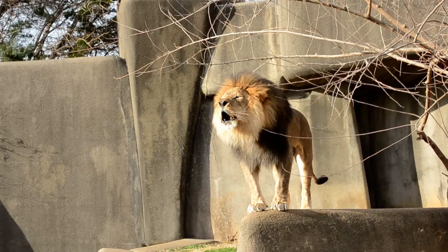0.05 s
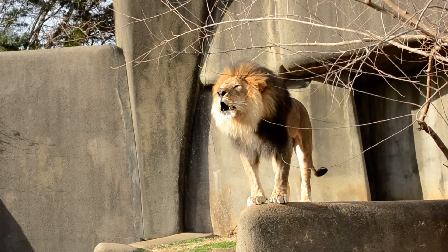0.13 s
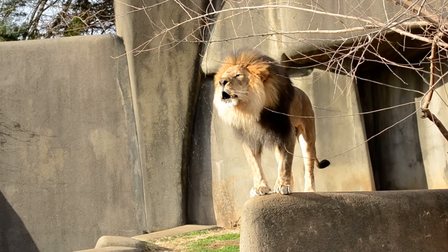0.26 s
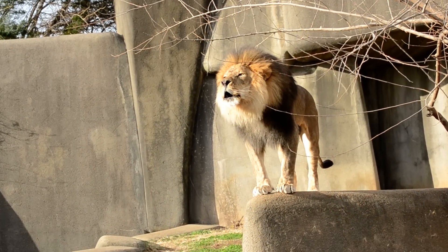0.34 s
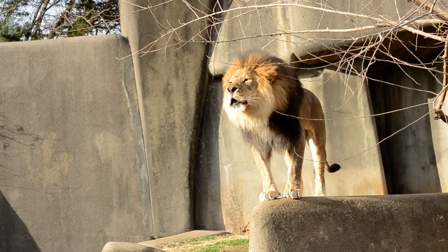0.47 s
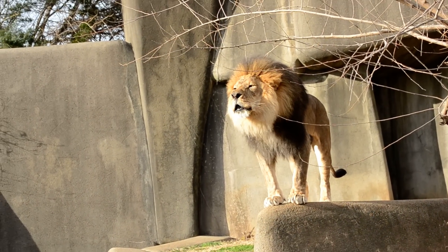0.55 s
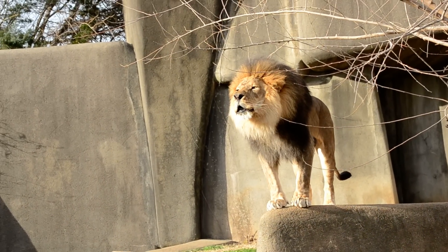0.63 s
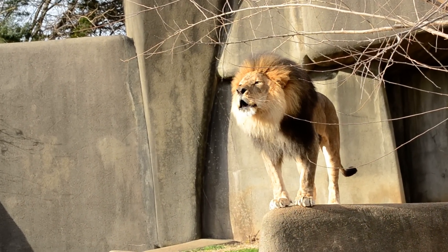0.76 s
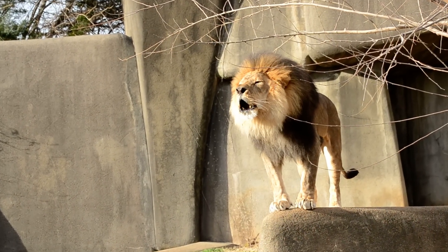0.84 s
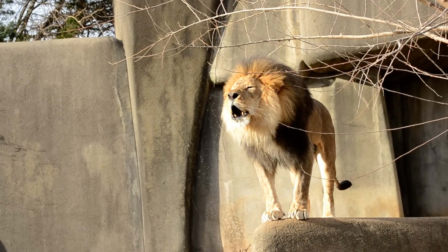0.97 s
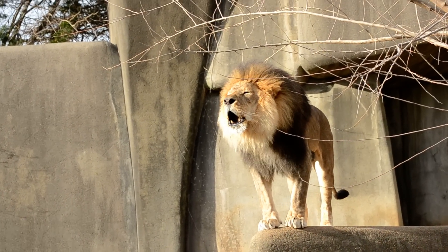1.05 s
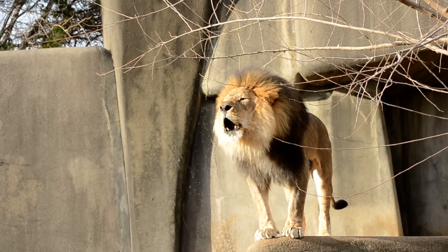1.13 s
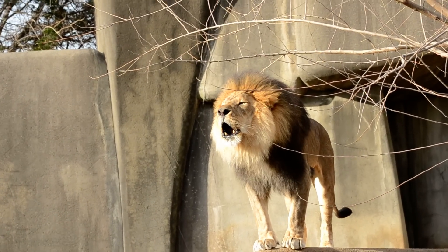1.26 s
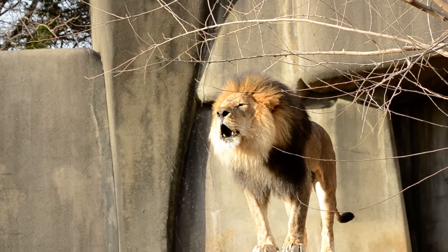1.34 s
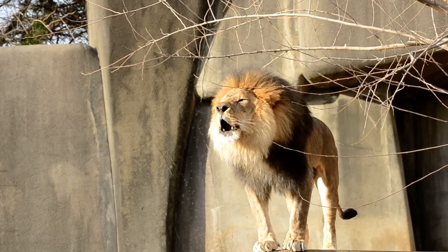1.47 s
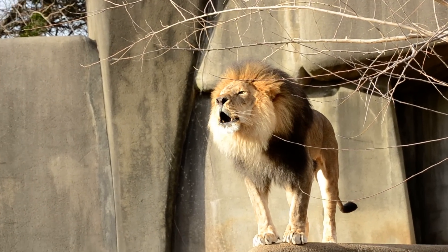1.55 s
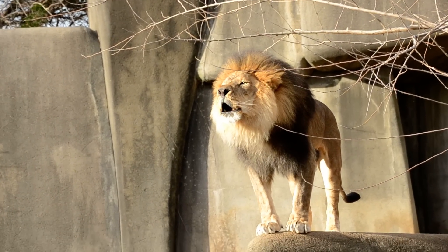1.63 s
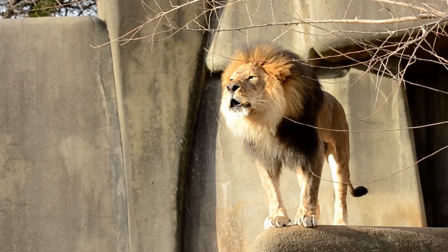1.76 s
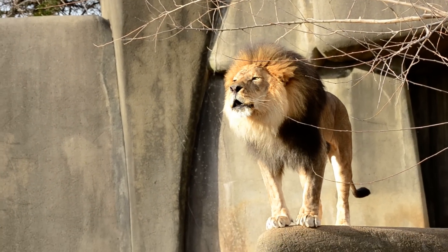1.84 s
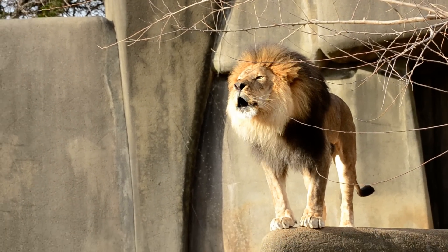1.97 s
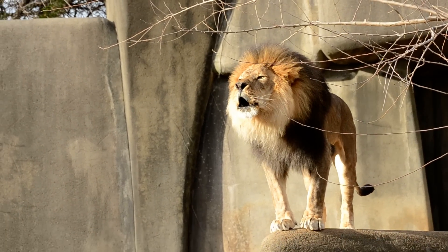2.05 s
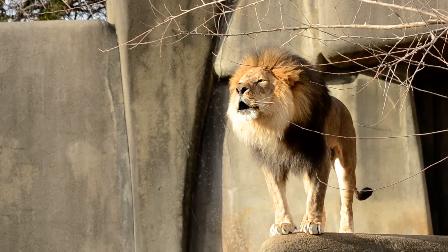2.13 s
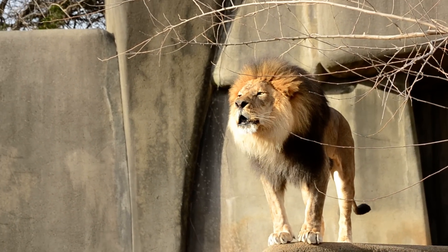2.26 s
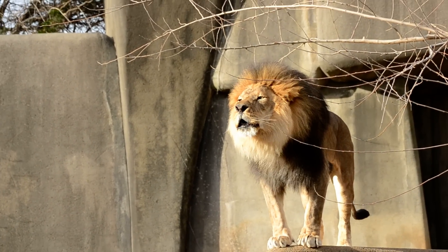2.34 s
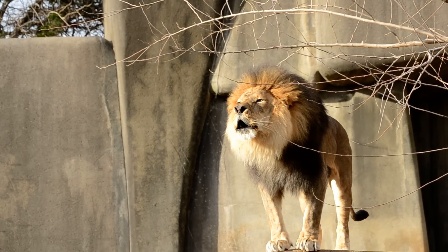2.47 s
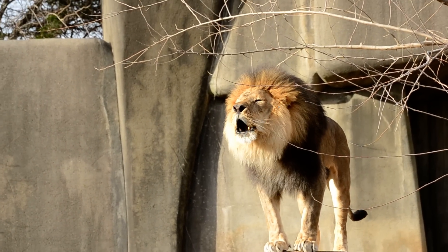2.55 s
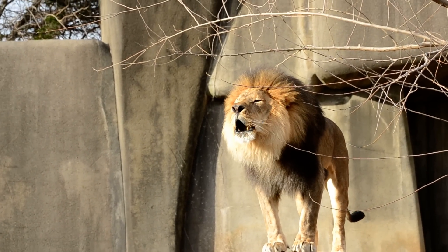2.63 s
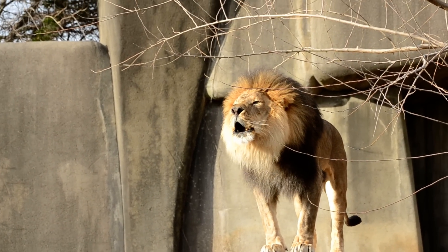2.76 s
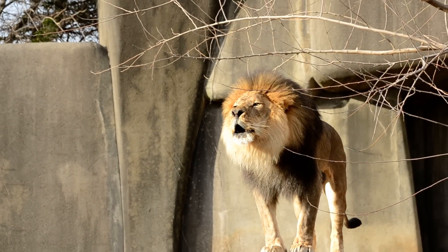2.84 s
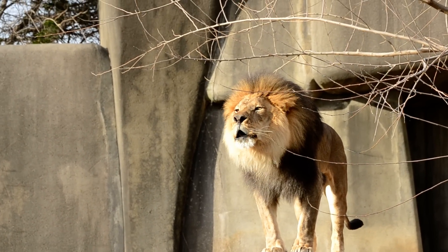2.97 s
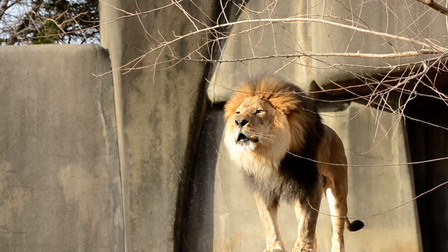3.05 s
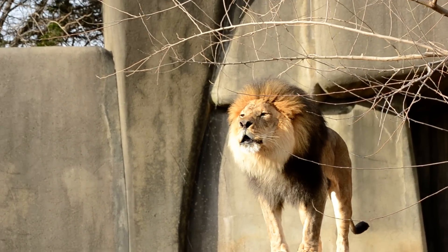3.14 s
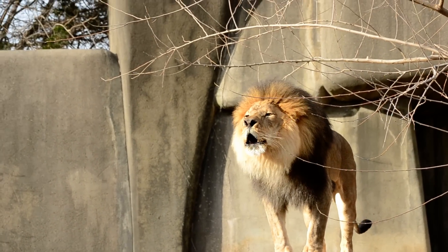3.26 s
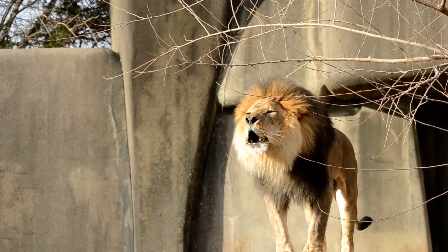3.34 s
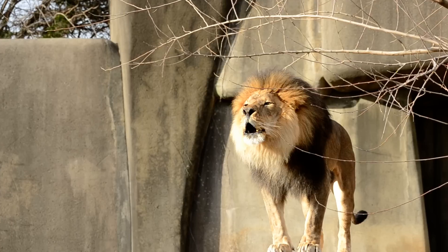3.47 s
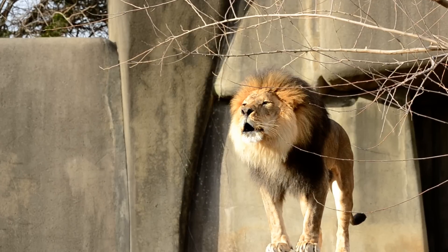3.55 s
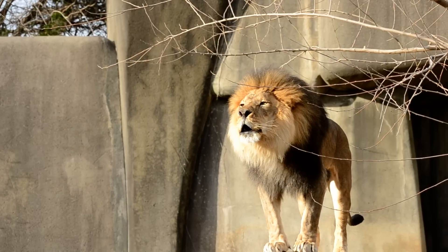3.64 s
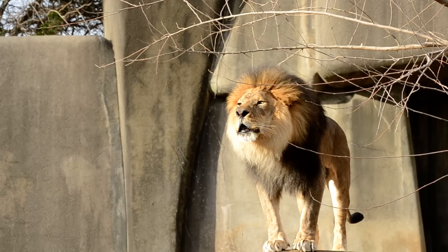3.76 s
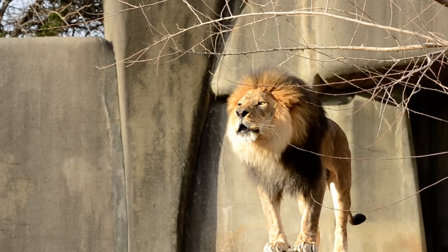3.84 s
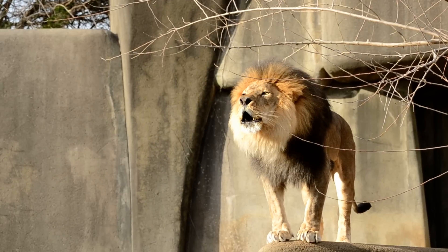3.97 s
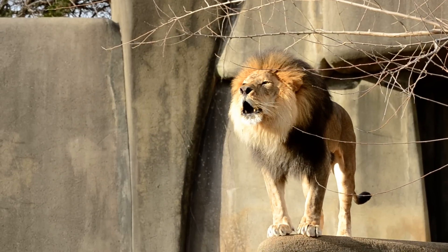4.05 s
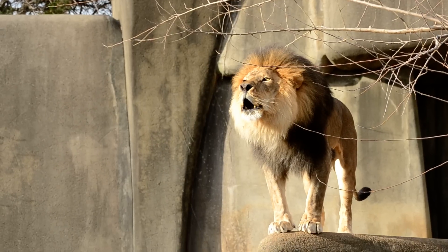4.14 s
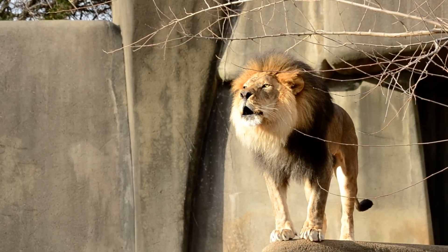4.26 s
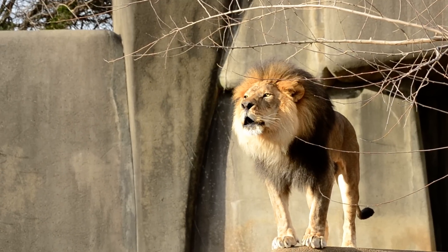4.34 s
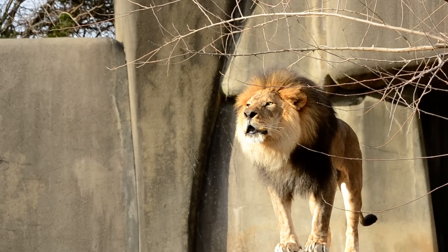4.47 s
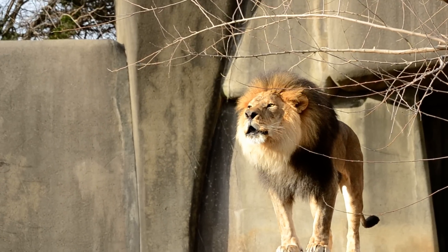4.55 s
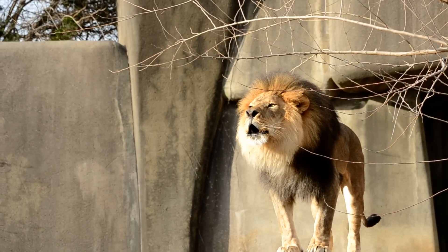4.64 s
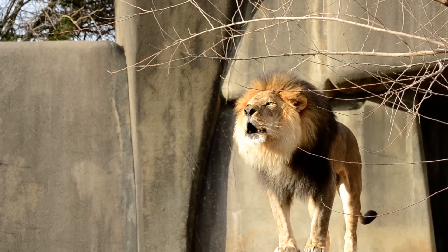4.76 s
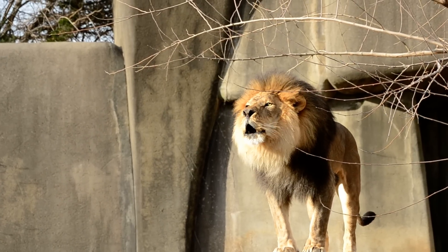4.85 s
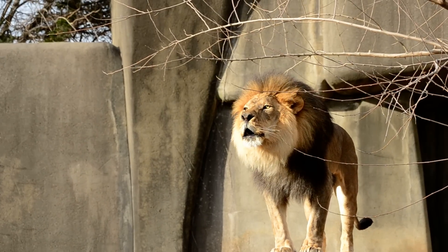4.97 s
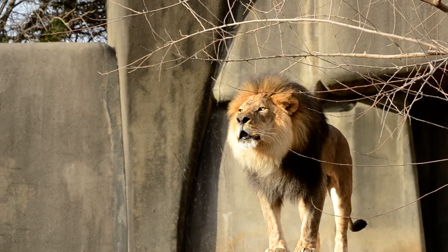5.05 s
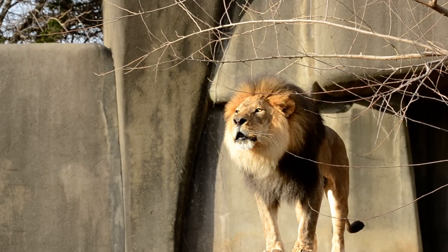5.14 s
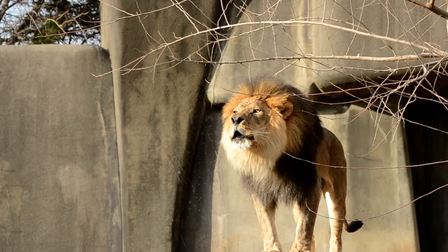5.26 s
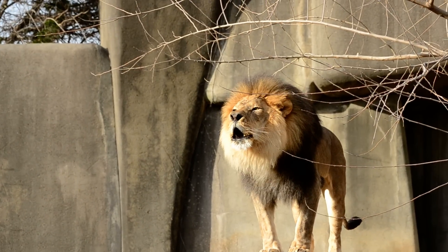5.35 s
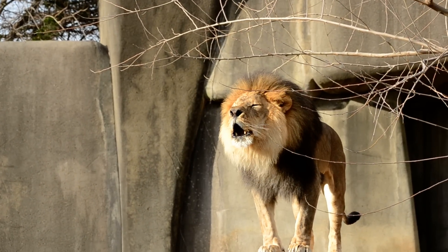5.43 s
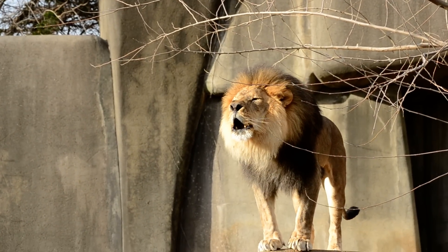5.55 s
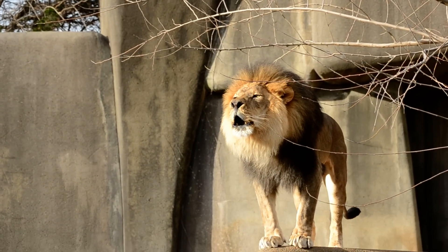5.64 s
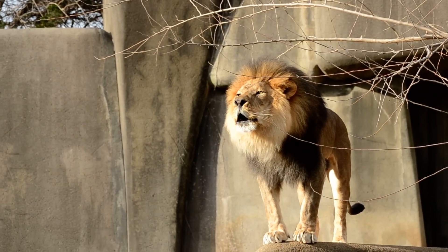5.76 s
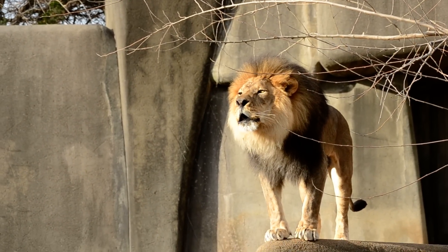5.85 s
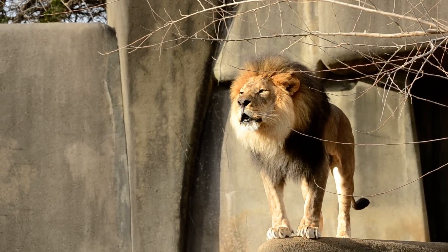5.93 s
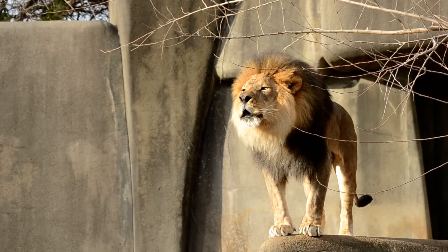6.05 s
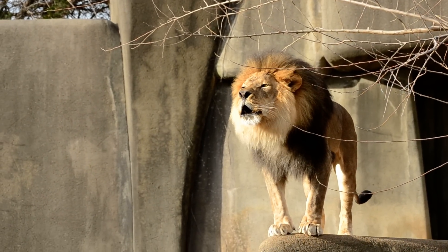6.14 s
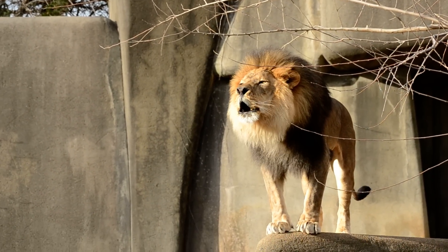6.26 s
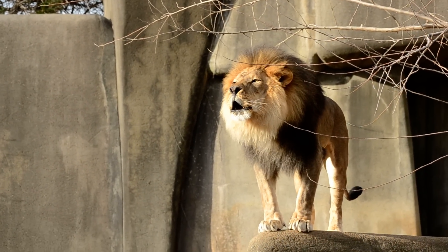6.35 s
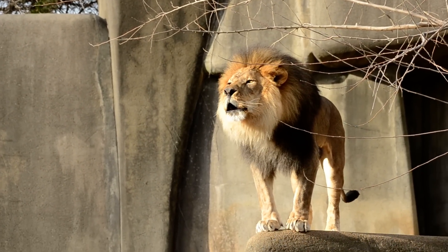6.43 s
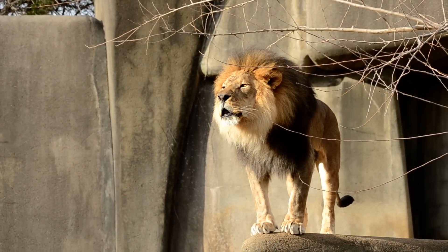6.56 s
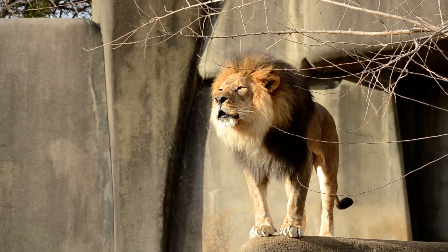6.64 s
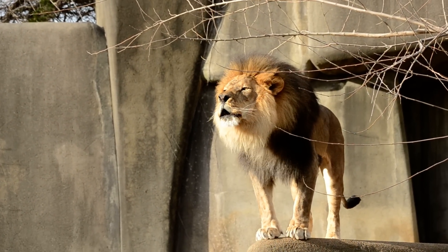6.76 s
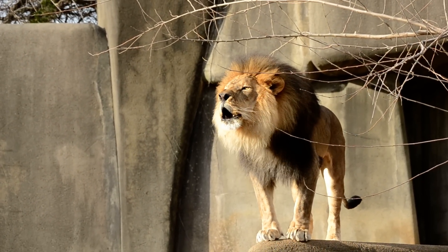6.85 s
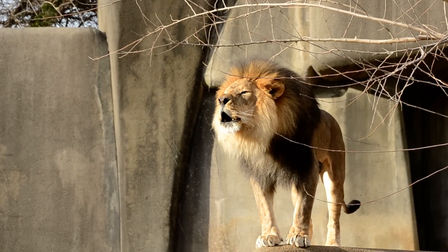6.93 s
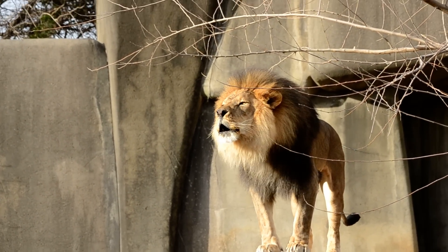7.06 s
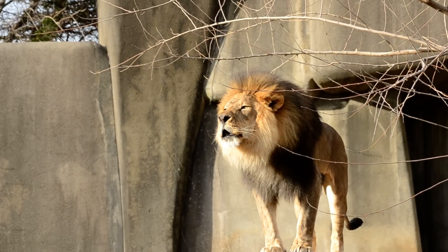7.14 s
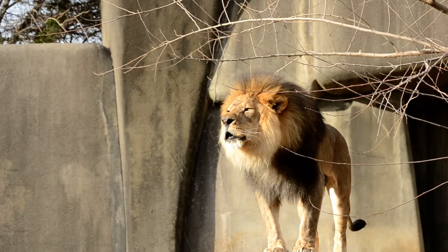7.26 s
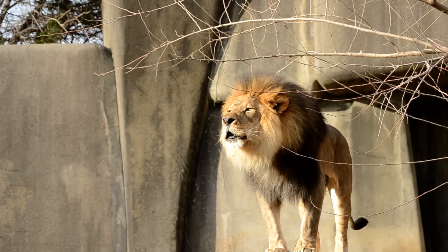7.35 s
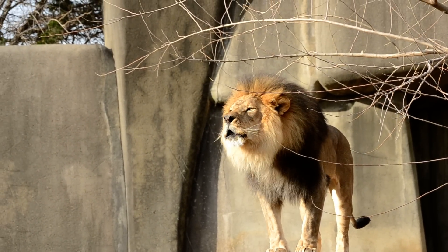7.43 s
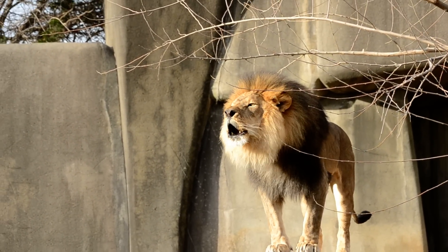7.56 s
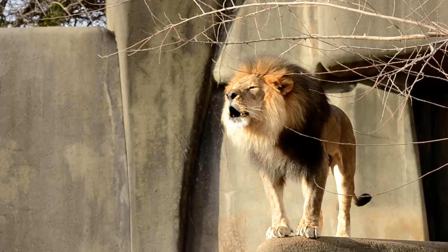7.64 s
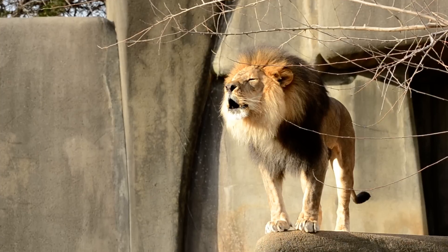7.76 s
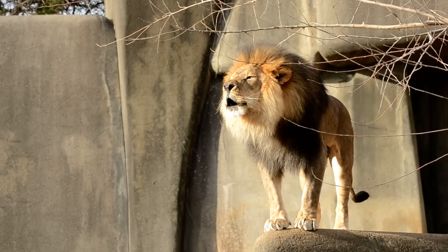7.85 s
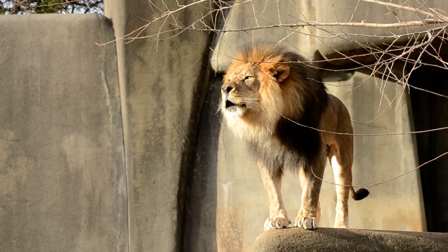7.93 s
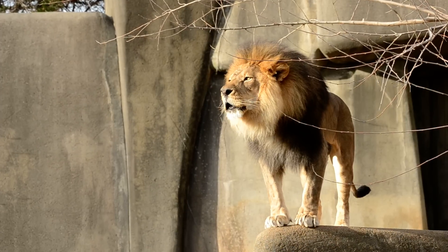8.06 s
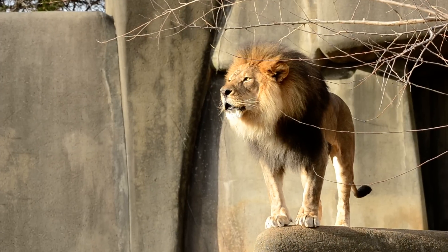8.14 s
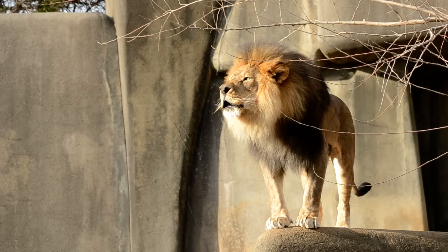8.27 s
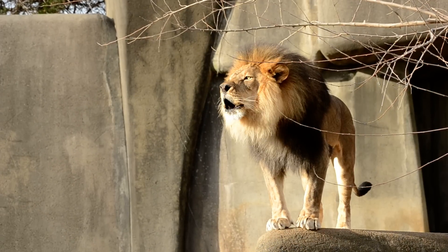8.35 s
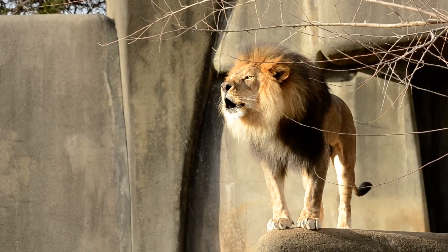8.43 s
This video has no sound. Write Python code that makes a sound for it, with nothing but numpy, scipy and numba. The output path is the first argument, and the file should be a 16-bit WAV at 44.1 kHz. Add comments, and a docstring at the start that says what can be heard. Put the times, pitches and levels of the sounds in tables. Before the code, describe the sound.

In an outdoor concrete enclosure, a male lion roars twelve times. The second call is a long, fuller moan; the rest are short, deep, rasping grunts that weaken slightly toward the end. His throat catches with rough slaps, his mouth clicks, and he breathes in softly once. Each call rings briefly off the walls, while a low hum, steady outdoor air and very faint birds sit behind.

```python
"""A male lion roars twelve times in a concrete zoo enclosure: hoarse grunts and one long moan.
His loose vocal folds flap unevenly into a long throat whose resonances rise and sink with each call;
single flaps slap hard, the mouth clicks, and he takes one soft in-breath. The walls throw the roars
back over a steady outdoor wash, a faint machine hum and distant birds."""
import sys
import numpy as np
from scipy import signal
from scipy.io import wavfile
from scipy.ndimage import uniform_filter1d
from numba import njit

SR = 44100
rng = np.random.default_rng(int(sys.argv[2]) if len(sys.argv) > 2 else 0)


def to_wav(s):
    """Save 16-bit WAV."""
    ch = np.atleast_2d(s).T  # columns
    pcm = np.round(np.clip(ch, -1, 1) * 32767)  # PCM
    wavfile.write(sys.argv[1], SR, pcm.astype(np.int16))


N = 374850
TIME = np.arange(N) / SR

# nominal resonances: f/Hz, width/Hz, level/dB in a grunt, then the same in a moan
CHEST_MODES = [(136.6, 19.7, -4.5, 166, 12, 6.5), (184.4, 40.3, -2, 190, 113, -15),
               (232.3, 51, -9, 245, 75, -27), (321, 25.2, 2.5, 393, 32, -0.5),
               (408.7, 53, -6, 550, 21, -13.5), (462, 14, -8.5, 536, 35, -17)]
MOUTH_MODES = [(709.4, 39.2, 5.5, 805, 62, -0.5), (829, 52, 2.5, 1017, 123, -1.5),
               (1072, 13.3, 0, 1200, 45, -5), (1192.6, 54, -3.5, 1216, 115, -12),
               (1280, 67, -45, 960, 46, -26)]
# air rushing past the teeth: f/Hz, relative density/dB
TEETH_SPECTRUM = [(1300, -16.5), (2700, 11), (4700, -5.5), (5700, -11), (7200, -10), (7900, -19),
                  (8500, -8.5), (10300, -9), (11500, -47)]


def gain_of(db):
    """Decibels to amplitude."""
    return 10 ** (np.asarray(db) / 20)


def unit_rms(x):
    """Scales to rms 1."""
    return x / np.sqrt(np.mean(x ** 2) + 1e-20)


def steadied(x, size=2000):
    """Holds the short-term rms at 1; single pulses still stand out."""
    power = uniform_filter1d(uniform_filter1d(x ** 2, size), size // 2)
    return x / np.sqrt(abs(power) + 1e-14)


def at_hz(points, hz):
    """Interpolates a table over log frequency."""
    f, value = np.transpose(points)
    return np.interp(np.log(hz + 1), np.log(f + 1), value)


def add(mix, start_s, sound):
    """Mixes a sound in at start_s."""
    part = mix[max(round(start_s * SR), 0):][:len(sound)]
    part += sound[:len(part)]


def band(x, low_hz, high_hz, order=4):
    """Causal band-pass."""
    return signal.sosfilt(signal.butter(order, [low_hz, high_hz], "band", fs=SR, output="sos"), x)


def coloured(x, spectrum, size=4096):
    """Minimum-phase filter with the given spectrum."""
    log_gain = np.log(gain_of(at_hz(spectrum, abs(np.fft.fftfreq(size, 1 / SR)))))
    taps = np.fft.ifft(np.exp(np.conj(signal.hilbert(log_gain)))).real
    return signal.oaconvolve(x, taps[:size // 2])[:len(x)]


def drift(t, top_hz, count=24):
    """Slow random motion of rms about 1."""
    hz = np.geomspace(top_hz / 10, top_hz, count)[:, None]
    return np.sin(2 * np.pi * (hz * t + rng.random((count, 1)))).sum(0) * np.sqrt(2 / count)


def swing(t, hz, waver, harmonics):
    """A slightly wavering vibration with equal harmonics."""
    turns = np.cumsum(hz * (1 + waver * drift(t, 45))) / SR
    return sum(np.cos(2 * np.pi * k * turns) for k in range(1, harmonics + 1))


@njit
def resonate(x, hz, width_hz):
    """A unit-gain resonance with moving centre and width."""
    out, state = np.zeros(len(x)), 0j
    for i in range(len(x)):
        r = np.exp(-np.pi * width_hz[i] / SR)
        state = state * r * np.exp(2j * np.pi * hz[i] / SR) + (1 - r) * x[i]
        out[i] = 2 * state.real
    return out


def background(wash_db=-43, swell_db=.6, waver_turns=0.11):
    """A nearly steady outdoor wash and a wavering machine hum."""
    # outdoor wash: f/Hz, relative density/dB
    wash_spectrum = [(25, -25), (60, -17), (115, 5), (230, -7), (300, -1.5), (600, -4.5), (950, 0.5),
                     (1500, -11), (2800, -15), (4500, -26.5), (6300, -28), (7900, -39.5), (10000, -36.5),
                     (11700, -67)]
    # machine tones: f/Hz, rms level/dB
    hum_tones = [(120, -70), (298, -55), (384, -61.5)]
    slow = TIME[::500]
    out = unit_rms(coloured(rng.standard_normal(N), wash_spectrum))
    out *= gain_of(wash_db + swell_db * np.interp(TIME, slow, drift(slow, 6)))
    for hz, db in hum_tones:
        turns = hz * TIME + waver_turns * np.interp(TIME, slow, drift(slow, 7.4))
        out += gain_of(db) * np.sqrt(2) * np.sin(2 * np.pi * turns)
    return out


def bird(length_s, hz, db, arch=0.078):
    """A thin whistle that rises and falls."""
    t = np.arange(0, length_s, 1 / SR)
    hump = np.sin(np.pi * t / length_s)
    return gain_of(db) * hump * swing(t, hz * (1 + arch * (hump - .5)), waver=0.022, harmonics=1)


def enclosure(x, tail_db=-8.5, walls_db=-10, walls_s=0.032, echoes=10,
              standing_hz=319, standing_width_hz=7, standing_db=-7):
    """Early echoes off the concrete, a diffuse tail and one standing wave between the walls."""
    # reverberation: f/Hz, T60/s
    decay_times = [(120, 0.51), (330, 0.94), (700, 0.54), (1500, 0.7), (4000, 0.5), (10000, 0.44)]
    taps = rng.standard_normal(SR) * (rng.random(SR) < .1) * np.minimum(TIME[:SR] / 0.041, 1)
    hz, t, spectra = signal.stft(taps, SR, nperseg=256)
    decay = gain_of(-60 * t / at_hz(decay_times, hz)[:, None])
    tail = signal.istft(spectra * decay, SR, nperseg=256)[1]
    response = gain_of(tail_db) * tail / np.linalg.norm(tail)
    arrivals = (SR * (.004 + walls_s * rng.random(echoes))).astype(int)
    response[arrivals] += gain_of(walls_db) * rng.choice([-1, 1], echoes) / np.sqrt(echoes)
    standing = resonate(x, standing_hz * np.ones(N), standing_width_hz * np.ones(N))
    return signal.fftconvolve(x, response)[:N] + gain_of(standing_db) * standing


def lion_inhale():
    """One soft in-breath after a roar: a short, high hiss of air."""
    # breath envelope: t/s, rms level/dB
    envelope = [(5.8, -82), (5.86, -55), (6.03, -55.5), (6.08, -90)]
    noise = unit_rms(band(rng.standard_normal(N), 4000, 8500, order=2))
    return gain_of(np.interp(TIME, *np.transpose(envelope))) * noise


def mouth_click(level_db, hz, trim_db=-1, decay_s=0.002, spread=1.265):
    """A tiny snap that rings briefly in the mouth."""
    t = TIME[:1500]
    snap = rng.standard_normal(len(t)) * np.exp(-t / decay_s)
    sound = band(snap, hz / spread, hz * spread, order=2)
    return gain_of(level_db + trim_db) * sound / abs(sound).max()


def glide(mode, moan):
    """Frequency, width and level of a resonance between grunt (0) and moan (1)."""
    return [a + (b - a) * moan for a, b in zip(mode[:3], mode[3:])]


def throat(x, modes, moan, stretch, damping, skirt=1.42):
    """A bank of gliding resonances; a wider second pass deepens the valleys."""
    out = np.zeros(len(x))
    for mode in modes:
        hz, width_hz, db = glide(mode, moan)
        ring = resonate(x, hz * stretch, width_hz * damping)
        out += gain_of(db) * resonate(ring, hz * stretch, width_hz * damping * skirt)
    return out


def fold_slap(level_db, trim_db=-4, puff_s=0.0051, chest_db=-5, hiss_db=-17, damping=2.32):
    """One hard flap: a single puff rings the slack throat and hisses past the teeth."""
    t = TIME[:3500]
    puff = rng.standard_normal(len(t)) * np.exp(-t / puff_s)
    moan, stretch = np.zeros(len(t)), np.ones(len(t))
    mouth = unit_rms(throat(puff, MOUTH_MODES, moan, stretch, damping))
    chest = unit_rms(throat(puff, CHEST_MODES, moan, stretch, damping))
    hiss = unit_rms(band(coloured(puff, TEETH_SPECTRUM), 1250, 12000))
    sound = mouth + gain_of(chest_db) * band(chest, 130, 700, order=6) + gain_of(hiss_db) * hiss
    return gain_of(level_db + trim_db) * sound / abs(sound).max()


def folds(rate_hz, uneven_db, jitter=.3, puff_s=0.0079, leak=0.18):
    """Uneven flaps, and the puff of turbulent air that each lets through."""
    n = len(rate_hz)
    wobble = unit_rms(uniform_filter1d(rng.standard_normal(n), size=250))
    turns = np.cumsum(rate_hz * np.exp(jitter * wobble)) / SR
    flaps = np.diff(np.floor(turns), prepend=0)
    pulses = flaps * gain_of(uneven_db * np.clip(rng.standard_normal(n), -2, 2))
    airflow = leak + signal.lfilter([1], [1, -np.exp(-1 / (puff_s * SR))], pulses)
    return unit_rms(pulses), unit_rms(airflow * rng.standard_normal(n))


def gesture(t, start_s, length_s, push_db, gape_db, gape_at_s, hoarse_db, moan):
    """Effort, mouth and rasp levels in dB: a quick push, one gape of the jaw, then the air runs out."""
    attack_db, attack_s = 25.5, .03
    sag_db, sag_s = 10, 0.079
    jaw_db, jaw_s = 7, 0.072
    drop_db, drop_s = 13, 0.031  # the rasp dies just before the voice
    surge_db, surge_hz = 1.5, 39.78
    age_s, left_s = t - start_s, start_s + length_s - t
    effort_db = push_db - attack_db * np.exp(-age_s / attack_s) - sag_db * np.exp(-left_s / sag_s)
    shut_db = jaw_db * (1 - np.exp(-((age_s - gape_at_s) / jaw_s) ** 2))
    rasp_db = hoarse_db - .25 * shut_db - drop_db * np.exp(-left_s / drop_s)
    rasp_db += surge_db * drift(t, surge_hz)
    # a tight throat sounds fuller and less hoarse
    return effort_db + 3 * moan, gape_db - shut_db - 4 * moan, rasp_db - 7.5 * moan


def roar(start_s, length_s, push_db, gape_db, gape_at_s, hoarse_db, tuning,
         chest_db=-1, rumble_db=-31, rasp_trim_db=-1, hiss_db=-7, moan_hiss_db=-7, build_s=0.041):
    """One call: flaps and puffs ring the chest, mouth and hoarse upper resonances."""
    # throat tightness: t/s, share (0 grunt, 1 moan)
    tightness = [(0.88, 0.34), (0.97, 0.55), (1.08, 0.97), (1.25, 1.0), (1.38, 0.9), (1.46, .7),
                 (1.54, 0.2), (1.64, 0.0052)]
    # course of a grunt: share of length, flap rate/Hz, unevenness/dB, frequency factor, width factor
    flap_course = [(0, 118, 3, .98, 1.09), (.35, 140, 3.5, 1.02, 1.0), (.7, 115, 5, .98, 1.53),
                   (1.001, 65, 10, 0.914, 1.6)]
    # nominal upper resonances: f/Hz, width/Hz, level/dB in a grunt, then the same in a moan
    rasp_modes = [(1805, 138, 13, 1890, 170, 5.5), (1988, 150, 12.5, 2177, 185, 9.5),
                  (2930, 510, 1.5, 2530, 980, 5), (3385, 594, 5, 3760, 1040, -1.5),
                  (4180, 595, 5, 4960, 370, -7.5)]
    t = np.arange(start_s, start_s + length_s, 1 / SR)
    moan = np.interp(t, *np.transpose(tightness), left=0, right=0)
    effort_db, mouth_db, rasp_db = gesture(
        t, start_s, length_s, push_db, gape_db, gape_at_s, hoarse_db, moan)
    stage, *columns = np.transpose(flap_course)
    progress = np.linspace(0, 1, len(t))
    grunt_hz, uneven_db, arch, blur = (np.interp(progress, stage, c) for c in columns)

    # resonances rise with the push, then sag and blur as the throat slackens
    stretch = (np.clip(tuning, .975, 1.025) * arch) ** (1 - moan)
    stretch *= 1 + 0.0086 * drift(t, 14)
    damping = blur ** (1 - moan)
    pulses, puffs = folds(grunt_hz * (1 + .42 * moan), uneven_db)
    # a smooth low swing in every call; the moan adds a brighter pitch locked to the throat
    low = swing(t, glide(CHEST_MODES[0], moan)[0] * stretch, waver=0.018, harmonics=1)
    bright = swing(t, glide(CHEST_MODES[3], moan)[0] * stretch / 2, waver=0.012, harmonics=12)
    tone = (.88 + .12 * moan) * low / damping
    sung = 0.11 * moan ** 2 * bright
    drive = pulses + 0.83 * puffs + sung
    turbulence = puffs + 0.36 * pulses

    body = band(throat(drive, CHEST_MODES, moan, stretch, damping), 112, 1200, order=6)
    rumble = (1 - moan) * gain_of(rumble_db) * unit_rms(band(pulses, 35, 92, order=2))
    chest = steadied(steadied(body) + tone) + rumble
    mouth = steadied(throat(drive, MOUTH_MODES, moan, stretch, damping))
    rasp = steadied(throat(turbulence + sung, rasp_modes, moan, stretch, damping))
    hiss = steadied(band(coloured(turbulence, TEETH_SPECTRUM), 1100, 20000))
    hiss *= gain_of(hiss_db + moan_hiss_db * moan)
    build = np.sqrt(np.minimum((t - start_s) / build_s, 1))  # turbulence lags the folds
    hoarse = gain_of(rasp_db + rasp_trim_db) * build * (rasp + hiss)
    voice = gain_of(chest_db) * chest + gain_of(mouth_db) * mouth + hoarse
    return gain_of(effort_db) * voice * signal.windows.tukey(len(t), 1800 / len(t))


def scene():
    """Lion and birds in the enclosure, over the background."""
    # calls: t/s, length/s, push/dB, mouth at widest/dB, delay to widest/s, rasp/dB, resonance factor
    roars = [ (0.043, 0.34, -21.5, 6.5, 0.13, -9.5, 1.037), (0.887, .82, -21.5, 3.5, 0.657, -6.5, 1.0),
             (2.026, 0.17, -21, 4, 0.068, -7.5, .99), (2.580, 0.34, -21.5, 6, 0.13, -8.5, 1.016),
             (3.34, .32, -23, 7, 0.13, -6, 1.025), (4.041, .31, -22.5, 7, 0.11, -6, 1.03),
             (4.712, .27, -23, 6.5, 0.12, -6.5, 1), (5.413, .41, -22.5, 6, 0.1, -8, 1.02),
             (6.216, 0.26, -21.5, 4.5, 0.13, -8.5, 1.0), (6.866, .28, -24, 3, 0.12, -6, .99),
             (7.586, .36, -24, 5.6, .11, -7.5, 0.98), (8.375, 0.33, -23.5, -1.5, 0.042, -8.5, 1.01), ]
    # hard flaps as a roar catches or breaks off: t/s, level/dB
    slaps = [(0.095, -7), (0.188, -6), (0.241, -3.5), (1.447, -8), (1.521, -11), (2.64, -11), (2.896, -4),
             (3.444, -3.5), (4.307, -11), (4.777, -6), (4.949, -12), (5.476, -8), (5.73, -10),
             (6.254, -11.5), (6.277, -8), (6.891, -12), (7.015, -4), (7.636, -8.5), (7.669, -8)]
    # mouth clicks in and between the roars: t/s, level/dB, f/Hz
    clicks = [(0.315, -15, 2420), (0.598, -37, 6500), (0.72, -32, 2620), (1.63, -16, 2540),
              (2.04, -23, 2460), (2.375, -25, 2790), (3.599, -25, 2500), (3.714, -34, 5100),
              (3.988, -33.5, 3410), (7.087, -20.5, 2580), (7.487, -33, 2750)]
    # distant birds: t/s, length/s, f/Hz, level/dB
    whistles = [(0.626, .09, 6600, -73), (0.73, .07, 6430, -67), (3.907, 0.02, 6200, -54.5),
                (5.184, 0.16, 2690, -49.5)]
    direct = np.zeros(N)
    for start_s, *call in roars:
        add(direct, start_s, roar(start_s, *call))
    for start_s, level_db in slaps:
        add(direct, start_s, fold_slap(level_db))
    for start_s, level_db, hz in clicks:
        add(direct, start_s, mouth_click(level_db, hz))
    for start_s, *whistle in whistles:
        add(direct, start_s, bird(*whistle))
    return (direct + enclosure(direct) + background() + lion_inhale())[None]


def record(dry):
    """A steep low-pass cuts the top treble."""
    edge_hz = 11300
    taps = signal.firwin(255, edge_hz, window=("kaiser", 9), fs=SR)
    return signal.oaconvolve(dry, taps[None], "same")


dry = scene()
out = record(dry)
to_wav(out)
```